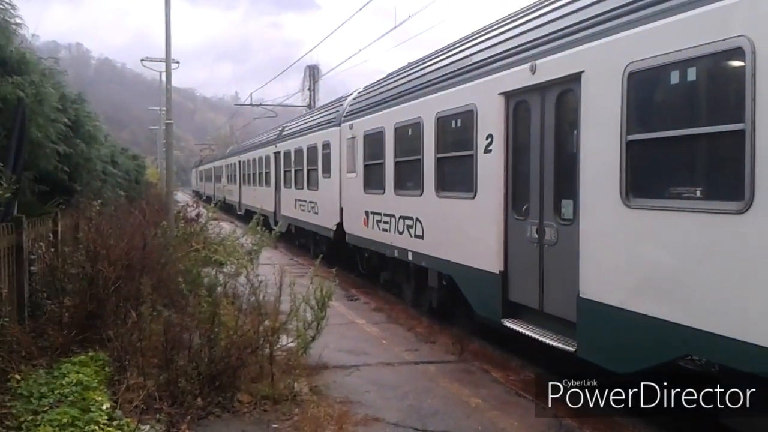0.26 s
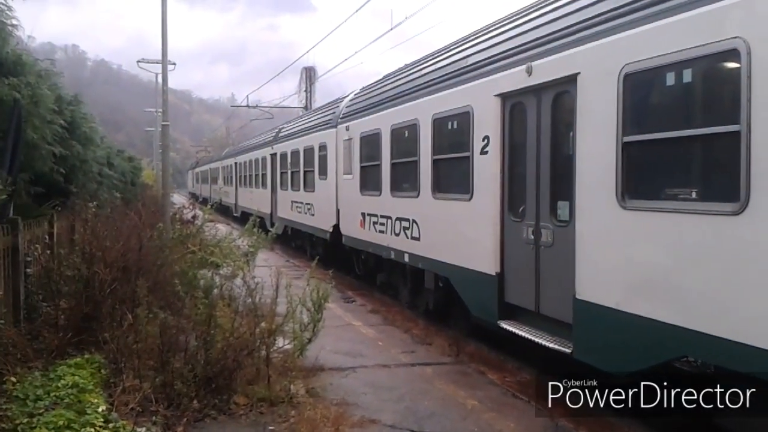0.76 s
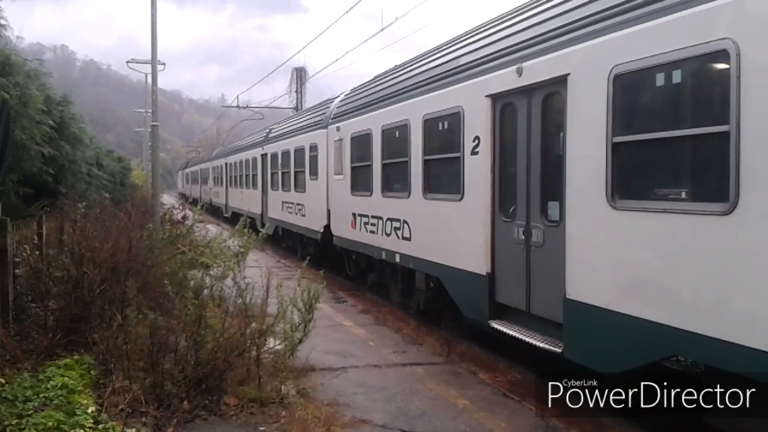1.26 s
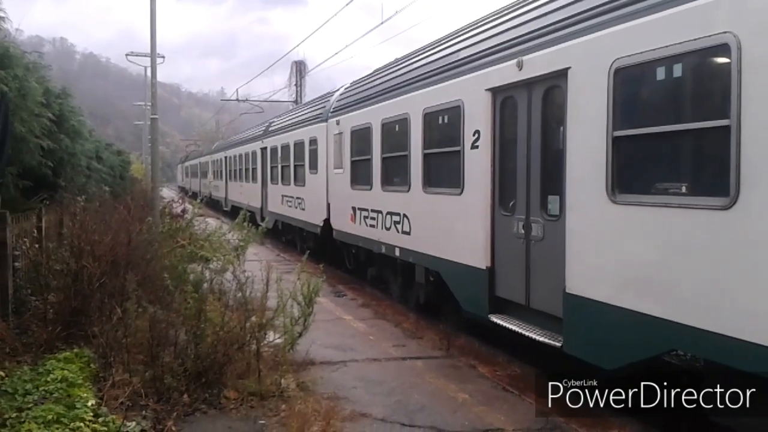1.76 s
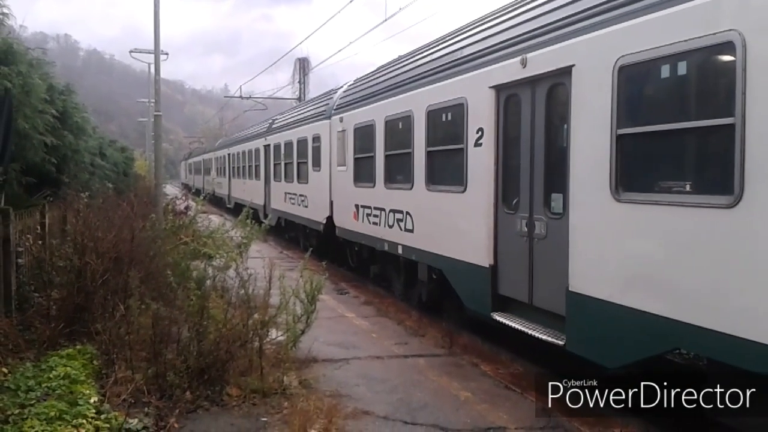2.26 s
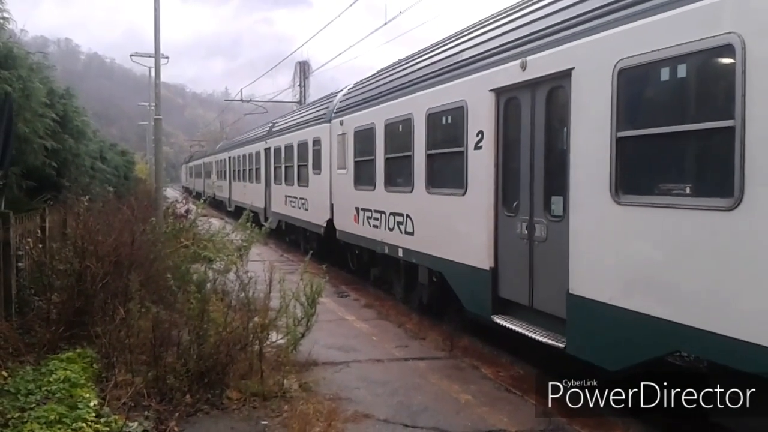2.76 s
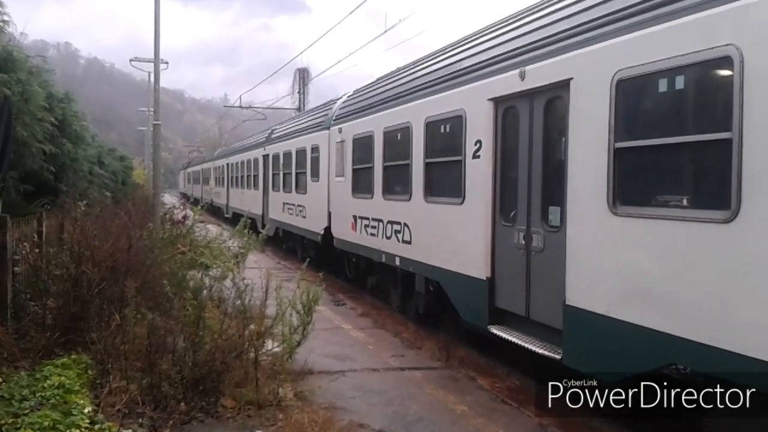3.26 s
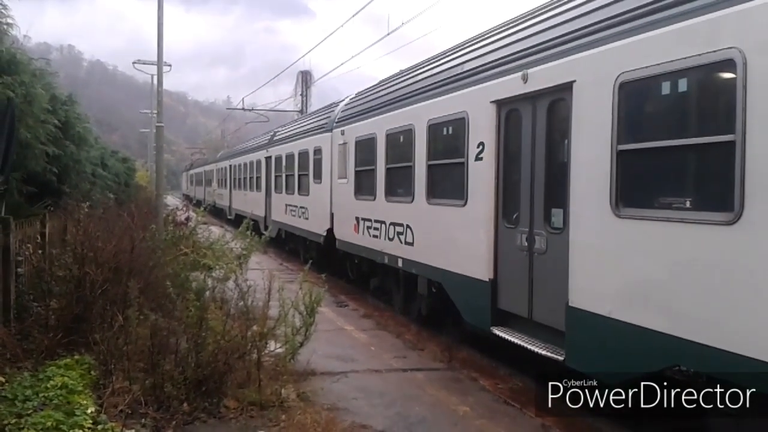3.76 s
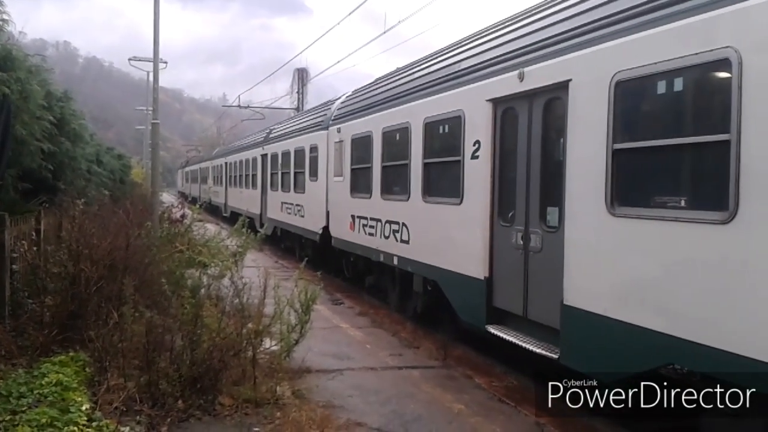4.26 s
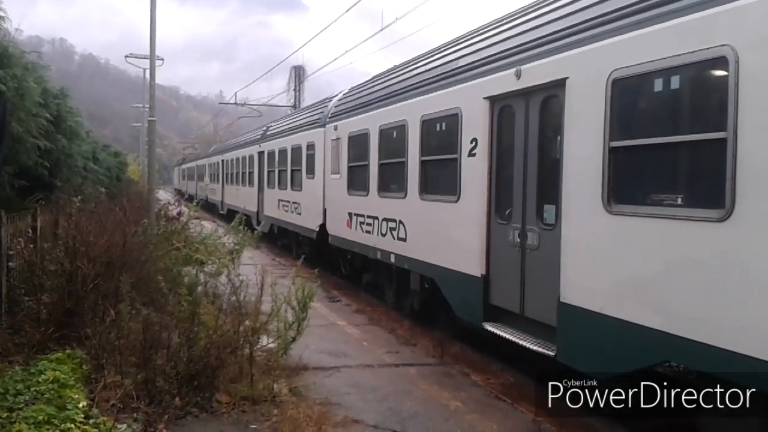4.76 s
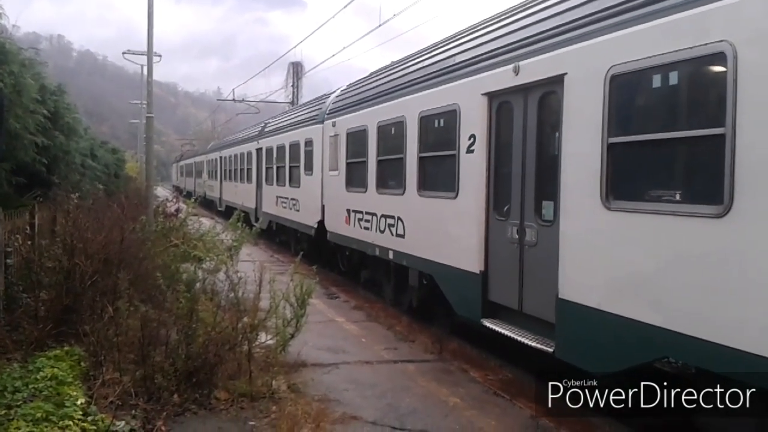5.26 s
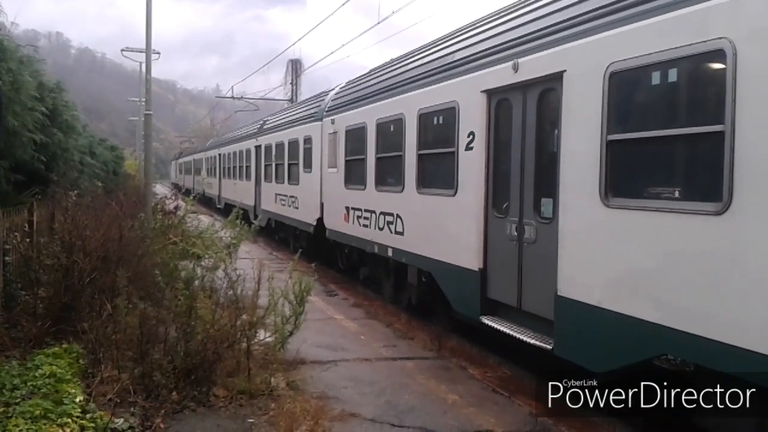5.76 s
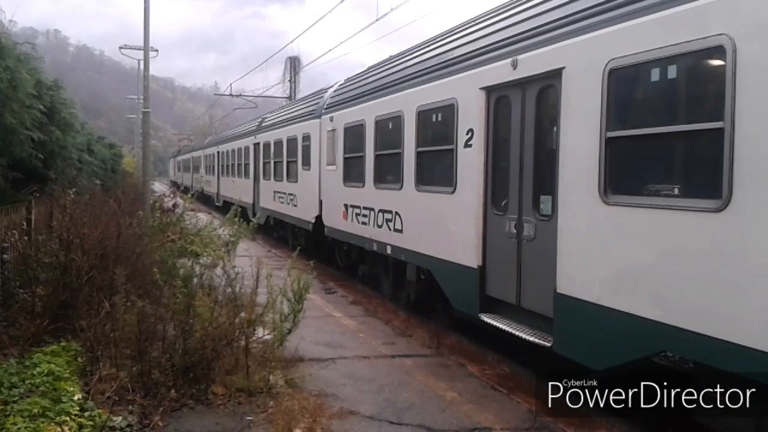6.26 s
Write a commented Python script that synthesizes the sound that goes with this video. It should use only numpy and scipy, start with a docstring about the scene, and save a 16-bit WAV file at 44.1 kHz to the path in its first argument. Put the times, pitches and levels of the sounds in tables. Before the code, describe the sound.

A loud, bright blast of compressed air hisses under a stationary train, slowly weakening, then shuts off, leaving a quiet electrical whine and blower rush.

```python
"""Compressed air hisses from a brake vent under a passenger train standing at a wet country platform: noise
coloured by a jet and ringing resonances, ever weaker and duller as the reservoir empties, until the valve shuts.
Behind it the power converter whines in steady tones, a small motor buzzes in harmonics, and blowers rush, rumble
and murmur as coloured noise beside a thin air leak. A drop, one short decaying sine, taps near the single
microphone."""
import sys
import numpy as np
from scipy import signal
from scipy.fft import rfft, irfft, next_fast_len
from scipy.io import wavfile
from scipy.ndimage import uniform_filter1d, map_coordinates

SR = 44100
rng = np.random.default_rng(int(sys.argv[2]) if len(sys.argv) > 2 else 0)


def generate_wav(sig):
    """Save sig (samples, or channels by samples) to the path in sys.argv[1] as 16-bit PCM at SR."""
    pcm = np.round(np.clip(np.atleast_2d(sig).T, -1, 1) * 32767).astype(np.int16)
    wavfile.write(sys.argv[1], SR, pcm)


N = 287079

# Colour of the air jet at the vent. Each row: frequency in Hz, relative density in dB per Hz.
JET_SPECTRUM = [(800, -70), (1750, -23.5), (2150, -20), (2500, -13.5), (3300, -16.3), (3750, -9),
                (4400, -8.8), (4900, -2.2), (5550, -11), (5760, -10), (6600, -16), (7500, -20), (8200, -32),
                (8800, -39)]
# Resonances under the car, driven by the jet. Each row: centre in Hz, width in Hz, relative strength in dB.
UNDERCAR_RESONANCES = [(1837, 54, 1.2), (3050, 20, -3.0), (2271, 28, -1.6), (2338, 54, -1.0),
                       (2560, 82, 0.1), (2773, 150, 1.6), (2931, 48, 1.9), (3007, 36, 3.0),
                       (3126, 27, -0.3), (3317, 34, 1.7), (3408, 20, -3.0), (3634, 38, 2.0),
                       (3695, 39, 4.1), (3754, 33, 6.6), (3807, 24, 2.3), (4006, 139, 1.5), (4067, 38, 3.7),
                       (4182, 50, 6.6), (4349, 150, 1.0), (4590, 47, 5.7), (4703, 26, 2.0),
                       (4757, 107, -3.0), (4874, 26, -3.0), (4953, 53, -1.1), (5057, 44, 0.1),
                       (5183, 20, -3.0), (5321, 56, 4.3), (5392, 23, -1.1), (5516, 30, 1.7),
                       (5581, 20, 1.2)]
# Broad rush of cooling air. Each row: frequency in Hz, relative density in dB per Hz.
RUSH_SPECTRUM = [(250, -26), (420, 0.5), (1090, 1), (1420, 0), (1850, -2), (2300, -1), (2930, -7),
                 (3600, -7.5), (5000, -30), (9000, -98)]
# Low rumble of the blowers. Each row: frequency in Hz, relative density in dB per Hz.
RUMBLE_SPECTRUM = [(12, -47.5), (20, -30), (27, -22.5), (46, -7.5), (65, 0.5), (189, 1.5), (226, -8.5),
                   (412, -8), (446, -14.5), (486, -1.5), (560, -35.5), (730, -54), (1230, -120)]
# Murmur of the blowers. Each row: frequency in Hz, relative density in dB per Hz.
MURMUR_SPECTRUM = [(170, -38), (210, 3.5), (260, -11), (330, -3.5), (420, -20.5), (900, -17), (1500, -30.5),
                   (3000, -98)]
# Thin steady air leak. Each row: frequency in Hz, relative density in dB per Hz.
LEAK_SPECTRUM = [(2000, -41.5), (3000, -16), (3700, -9), (4300, -2.5), (4850, -2), (5300, -4), (5800, -12),
                 (6400, -6.5), (6750, -15.5), (7200, -14), (7900, -31.5), (8300, -42.5), (8700, -22),
                 (9500, -59)]
# Pitch of the small motor, wandering with its load. Each row: time in seconds, fundamental in Hz.
MOTOR_PITCH = [(0, 279.8), (1.1, 278.2), (3.1, 279), (3.65, 281.2), (4.3, 279), (6.51, 280.1)]
# Harmonics of the motor that sound. Each entry: multiple of the fundamental.
MOTOR_HARMONICS = [4, 5, 6, 7, 8, 10, 11, 12, 13, 14, 15, 16, 20, 24, 25]
# Their levels ahead of the load shift and drift. Each entry: level in dB rms, in the order of the harmonics.
MOTOR_LEVELS_DB = [-59, -55, -61, -53, -64, -64, -64, -62, -61, -58, -62, -56, -61, -67, -58]
# Converter tones that sound. Each entry: multiple of the output frequency.
CONVERTER_ORDERS = [30, 31, 32, 33, 62, 63, 64, 66, 67, 91, 95, 96, 97, 99, 101, 122, 124, 132, 133, 144]
# Their levels, about which each drifts. Each entry: level in dB rms, in the order of the multiples.
CONVERTER_LEVELS_DB = [-65, -61, -62, -58, -65, -62, -57, -66, -66, -55, -50, -60, -54, -57, -58, -63, -61,
                       -66, -62, -72]
# One lone tone. The row: frequency in Hz, level in dB rms about which it drifts.
LONE_TONE = (2129.4, -54)
# Drops near the microphone. Each row: start in seconds, strength in dB ahead of the soft onset, pitch in Hz.
DROP_TAPS = [(1.4464, -13, 600)]

OUTPUT_HZ = 50.448  # converter output frequency
TOP_HZ = 8870  # band limit at the microphone
# Reservoir: jet level at first, time it would run dry, dB lost per decade of pressure; ahead of the dulling
START_DB, EMPTY_S, FALL_DB = -18.5, 8.67, 23.5
CREEP_S, CREEP_DB_PER_S = 4.475, 13.5  # the valve first creeps towards its seat
SHUT_S, SHUT_DB_PER_S = 4.685, 184.5  # it starts to close, and how fast the jet then falls
SEEP_DB, SEEP_DB_PER_S = -14.5, 7.5  # air seeping past it, against the jet after the creep, and its decay
RUSH_DB, LEAK_DB, RUMBLE_DB, MURMUR_DB = -42.5, -40, -41, -51.5  # rms, ahead of drift, growth and swell
LEAK_GROWS_DB_PER_S = .5  # from the moment the valve starts to close
SWELL_S, SWELL_WIDTH_S, SWELL_DB = 5.52, 0.87, 8  # murmur swell: peak, Gaussian 1/e half width, height
LOAD_S, LOAD_RISE_S = 5.15, .08  # the motor's tone changes: middle of the change, time it takes
UPPER_BEFORE_DB, UPPER_AFTER_DB = -2.5, 2.2  # shift of the upper motor harmonics
LOWEST_BEFORE_DB, LOWEST_AFTER_DB = 1, -5  # shift of the lowest one that sounds
DROP_CYCLES, DROP_RISE_CYCLES = 4.5, .6  # cycles to die by 60 dB, time constant of the rise in cycles


def amp(db):
    """Amplitude factor for a level in dB."""
    return 10 ** (np.asarray(db) / 20)


def unit(x):
    """x at rms 1."""
    return x / np.sqrt(np.mean(x ** 2) + 1e-20)


def clock():
    """Time of every sample in seconds."""
    return np.arange(N) / SR


def along(points, hz):
    """Read a curve of (Hz, value) points on a log frequency axis."""
    point_hz, value = np.transpose(points)
    return np.interp(np.log(hz + 1), np.log(point_hz + 1), value)


def wobble(rate):
    """A smooth random curve with rate knots a second."""
    knots = rng.standard_normal(int(N * rate / SR) + 4)
    return map_coordinates(knots, [np.arange(N) * rate / SR])


def filtered(x, response):
    """Multiply the spectrum of x by a response of frequency in Hz."""
    m = next_fast_len(N + SR // 2)
    gain = response(np.fft.rfftfreq(m, 1 / SR))
    return irfft(rfft(x, m) * gain, m)[..., :N]


def noise(spectrum, patchy_db):
    """Coloured noise of rms 1, with patches of random gain in time and frequency."""
    cells = signal.stft(rng.standard_normal(N), nperseg=512)[2]
    patches = uniform_filter1d(rng.standard_normal(cells.shape), size=6, axis=0)
    patches = uniform_filter1d(patches, size=14, axis=1)
    white = signal.istft(cells * amp(patchy_db * unit(patches)), nperseg=512)[1][:N]
    return unit(filtered(white, lambda hz: amp(along(spectrum, hz))))


def scatter(x, span_s, wet_db):
    """Add many small reflections off wheels, pipes and ballast, unchanged throughout; rms 1."""
    t = np.arange(round(3 * span_s * SR)) / SR
    echoes = rng.standard_normal(len(t)) * np.exp(-(t / span_s) ** 2)
    echoes = amp(wet_db) * echoes / np.linalg.norm(echoes)
    echoes[0] = 1  # the direct path
    return unit(signal.fftconvolve(x, echoes)[:N])


def tone(hz, db, drift_db, waver):
    """A sine whose level drifts and whose phase wanders (waver in radians) as the air moves."""
    cycles = np.cumsum(np.broadcast_to(hz, N)) / SR + rng.random()
    phase = 2 * np.pi * cycles + waver * wobble(6)
    level = amp(db + drift_db * wobble(1.5))
    return np.sqrt(2) * level * np.sin(phase)


def blowers():
    """Turbulent cooling air: a broad rush, a low rumble and a murmur that swells once by itself."""
    rush = amp(RUSH_DB + .4 * wobble(1.2)) * noise(RUSH_SPECTRUM, patchy_db=1.38)
    rumble = amp(RUMBLE_DB + 0.52 * wobble(1.2)) * noise(RUMBLE_SPECTRUM, patchy_db=0.8)
    swell = np.exp(-((clock() - SWELL_S) / SWELL_WIDTH_S) ** 2)
    murmur = amp(MURMUR_DB + SWELL_DB * swell) * noise(MURMUR_SPECTRUM, patchy_db=.6)
    return rush + rumble + murmur


def leak():
    """Turbulence of a thin air leak, scattered nearby, firming up from when the valve starts to close."""
    growth_db = LEAK_GROWS_DB_PER_S * np.maximum(clock() - SHUT_S, 0)
    hiss = scatter(noise(LEAK_SPECTRUM, patchy_db=1.2), span_s=.02, wet_db=-12)
    return amp(LEAK_DB + growth_db) * hiss


def converter():
    """Switching tones cluster round multiples of the carrier, 32 times the output frequency; plus a lone tone."""
    whine = sum(tone(order * OUTPUT_HZ, db, drift_db=1.2, waver=.3)
                for order, db in zip(CONVERTER_ORDERS, CONVERTER_LEVELS_DB))
    return whine + tone(*LONE_TONE, drift_db=1.2, waver=.3)


def motor():
    """Harmonics share one pitch but drift alone; late on the upper ones gain and the lowest drops."""
    pitch_hz = np.interp(clock(), *np.transpose(MOTOR_PITCH))
    late = np.clip((clock() - LOAD_S) / LOAD_RISE_S + .5, 0, 1)
    upper_db = UPPER_BEFORE_DB + late * (UPPER_AFTER_DB - UPPER_BEFORE_DB)
    lowest_db = LOWEST_BEFORE_DB + late * (LOWEST_AFTER_DB - LOWEST_BEFORE_DB)
    levels_db = [MOTOR_LEVELS_DB[0] + lowest_db] + [db + upper_db for db in MOTOR_LEVELS_DB[1:]]
    return sum(tone(k * pitch_hz, db, drift_db=2, waver=.4) for k, db in zip(MOTOR_HARMONICS, levels_db))


def drops():
    """Soft taps close by: a sine that rises softly and dies within a few cycles."""
    out = np.zeros(N)
    t = np.arange(SR // 20) / SR
    for start_s, db, hz in DROP_TAPS:
        onset = 1 - np.exp(-t * hz / DROP_RISE_CYCLES)
        decay = amp(db - 60 * t * hz / DROP_CYCLES)
        out[round(start_s * SR):][:len(t)] -= decay * onset * np.sin(2 * np.pi * hz * t)
    return out


def undercar_response(hz):
    """The space under the car: resonances add their power to a floor that passes the plain jet."""
    lift = sum(amp(db) ** 2 / (1 + (2 * (hz - centre) / width) ** 2) ** 2
               for centre, width, db in UNDERCAR_RESONANCES)
    return np.sqrt(.3 + lift)


def valve_db():
    """Gain of the closing valve: a slow creep, a quick fall, then air seeping past the seat."""
    t = clock()
    since = np.maximum(t - SHUT_S, 0)
    closing_db = np.maximum(-SHUT_DB_PER_S * since, SEEP_DB - SEEP_DB_PER_S * since)
    return closing_db - CREEP_DB_PER_S * np.clip(t - CREEP_S, 0, SHUT_S - CREEP_S)


def vent():
    """Jet turbulence, sharpened by the resonances around it; lower pressure makes it weaker and duller."""
    pressure = 1 - np.minimum(clock(), SHUT_S) / EMPTY_S
    level_db = START_DB + FALL_DB * np.log10(pressure)
    jet = filtered(noise(JET_SPECTRUM, patchy_db=0.3), undercar_response)
    light = scatter(jet, span_s=.03, wet_db=-15)
    heavy = scatter(jet, span_s=.024, wet_db=-8)
    # short waves scatter more
    jet = light + filtered(heavy - light, lambda hz: hz > 5700)
    low = filtered(jet, lambda hz: 1 / (1 + (hz / 3400) ** 8))
    high = jet - low
    # zero at first, then negative: the upper part falls faster than the lower
    dull_db = 0.16 * (level_db - level_db.max())
    flutter_db = 0.18 * wobble(5) + 0.12 * wobble(18)
    balanced = amp(-3 * dull_db) * low + amp(dull_db + 2.5) * high
    return amp(level_db + valve_db() + flutter_db) * balanced


def scene():
    """One microphone hears every source and feeds both channels."""
    mono = blowers() + leak() + converter() + motor() + drops() + vent()
    return np.array([mono, mono])


def record(dry):
    """The microphone's chain passes nothing above its band limit."""
    return filtered(dry, lambda hz: hz < TOP_HZ)


dry = scene()
out = record(dry)
generate_wav(out)
```